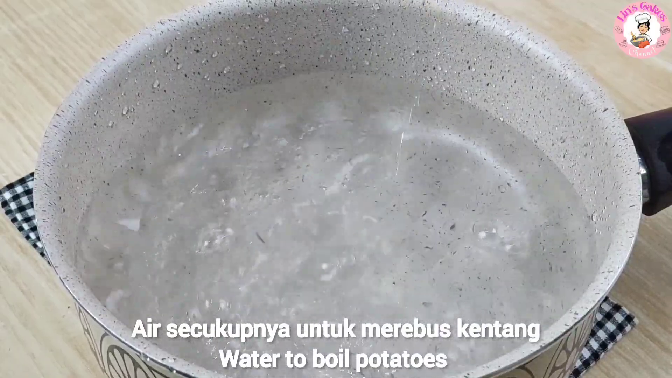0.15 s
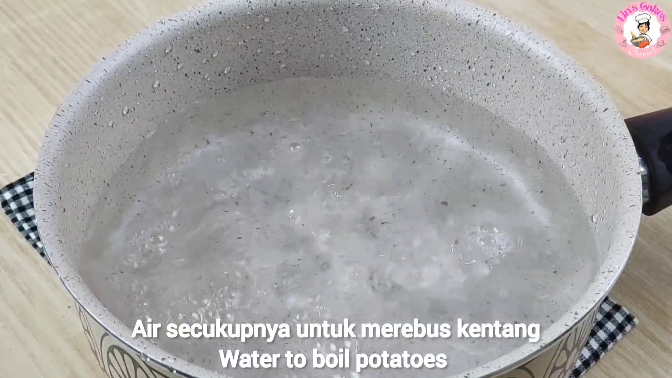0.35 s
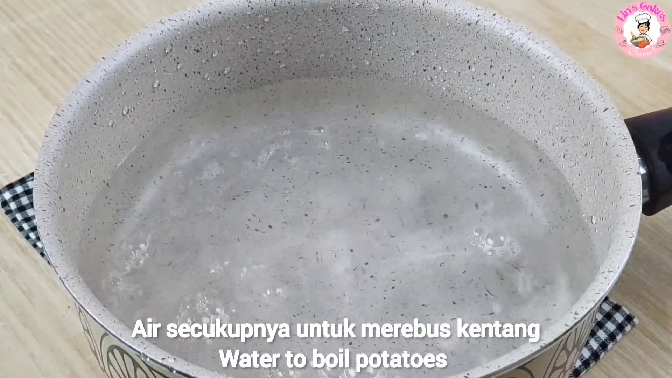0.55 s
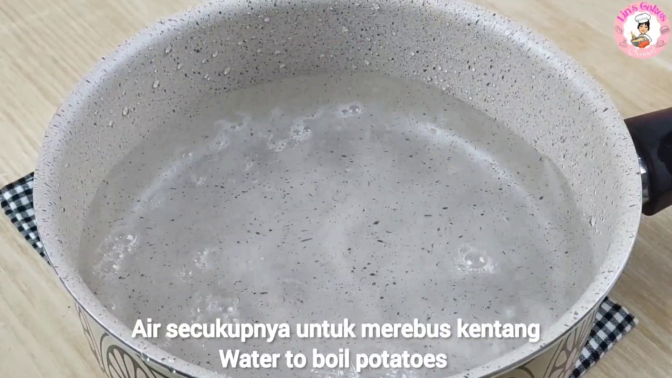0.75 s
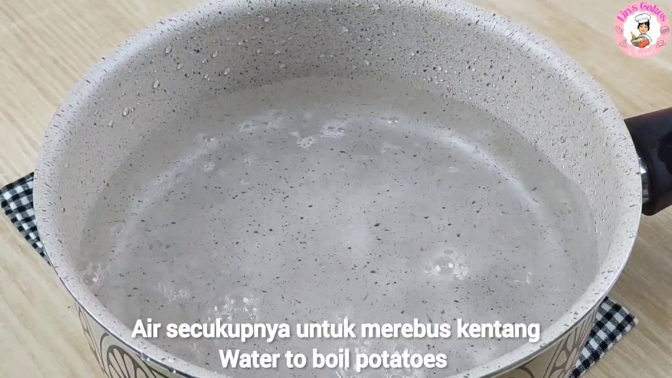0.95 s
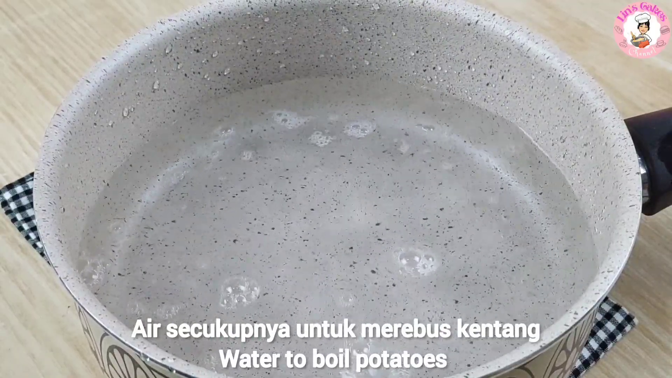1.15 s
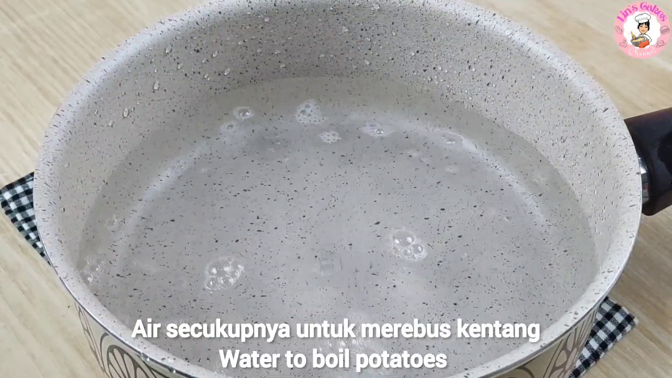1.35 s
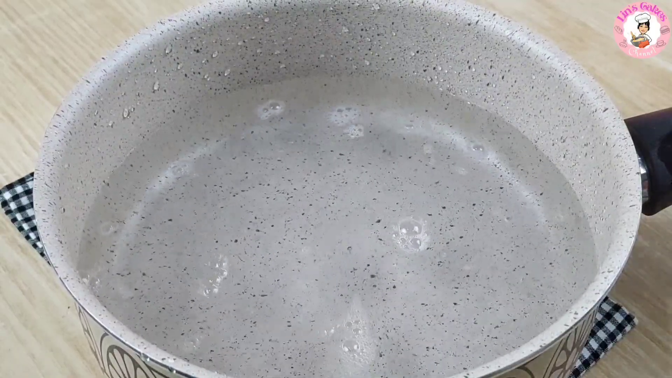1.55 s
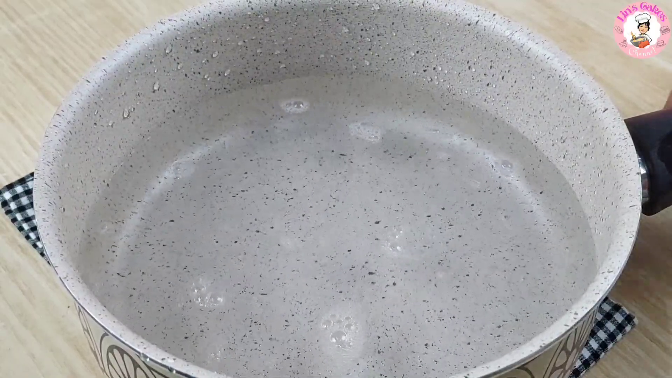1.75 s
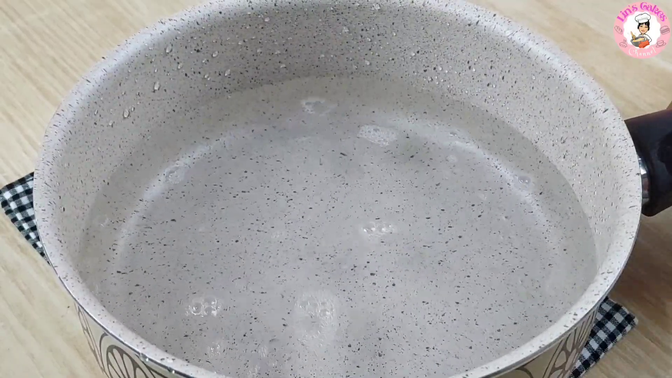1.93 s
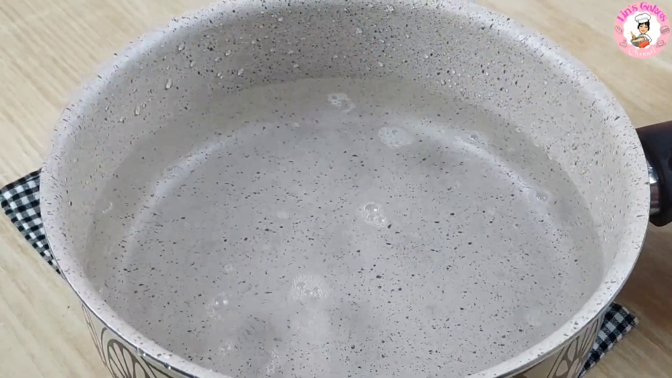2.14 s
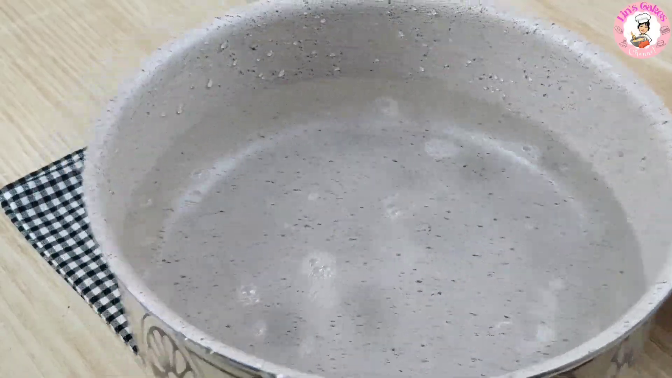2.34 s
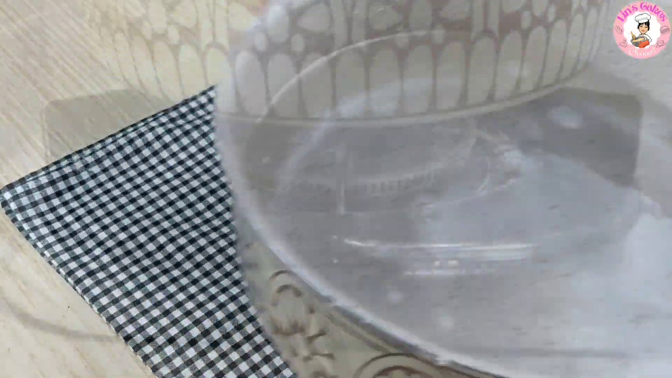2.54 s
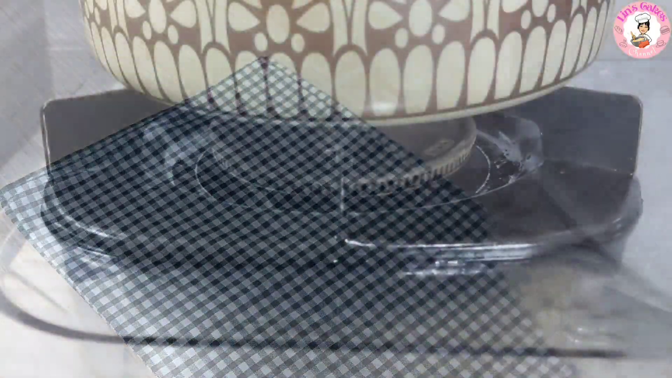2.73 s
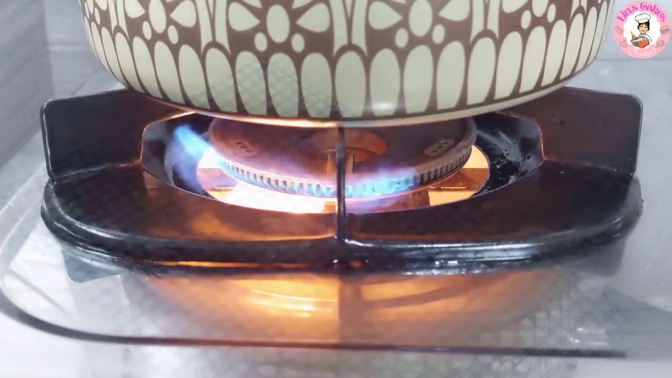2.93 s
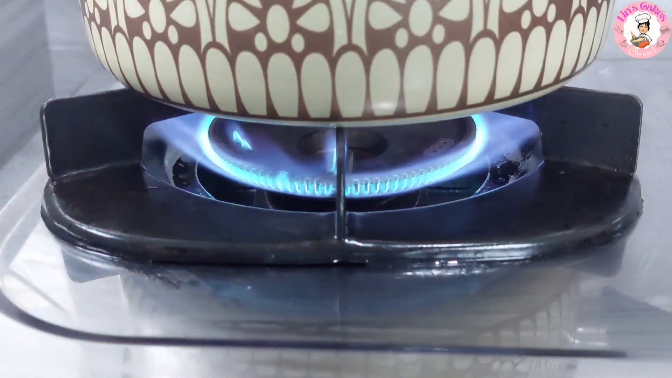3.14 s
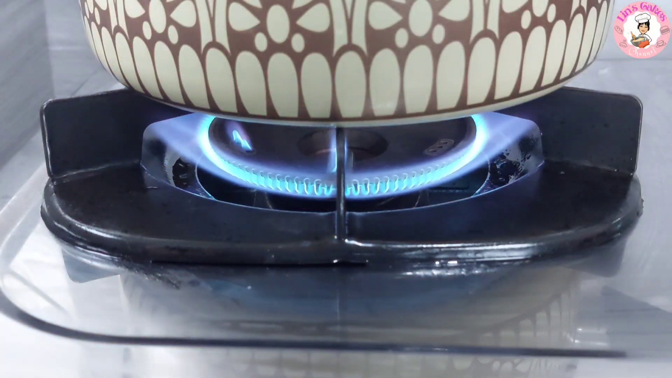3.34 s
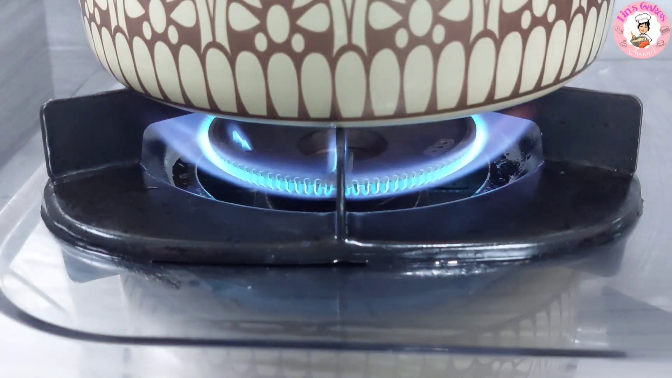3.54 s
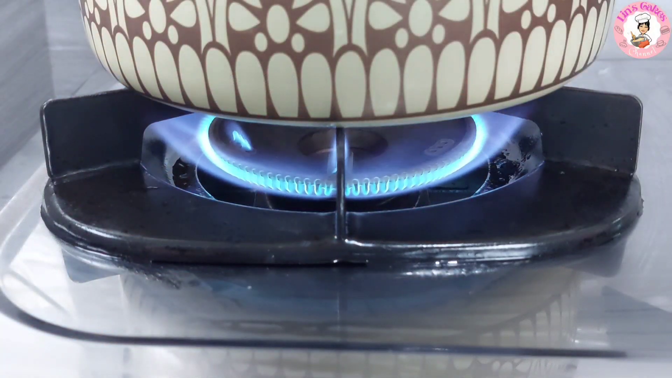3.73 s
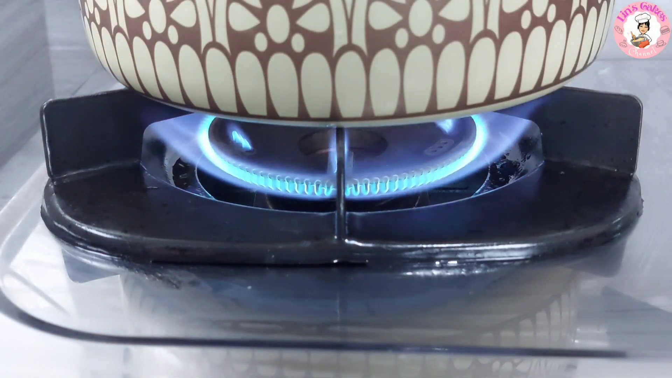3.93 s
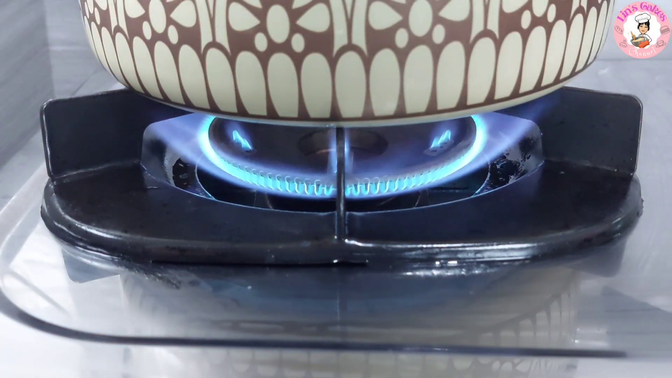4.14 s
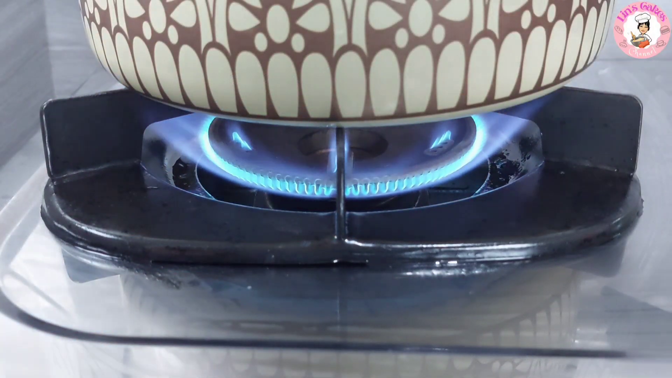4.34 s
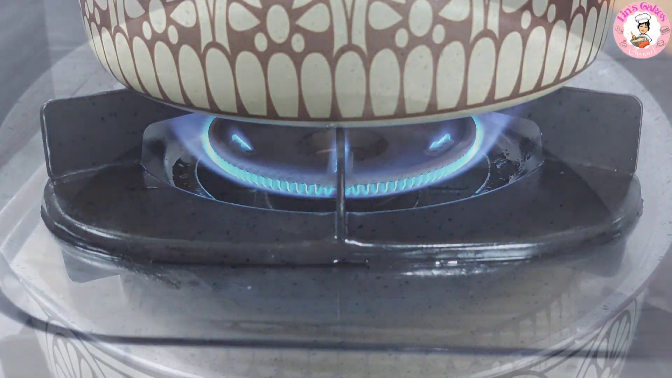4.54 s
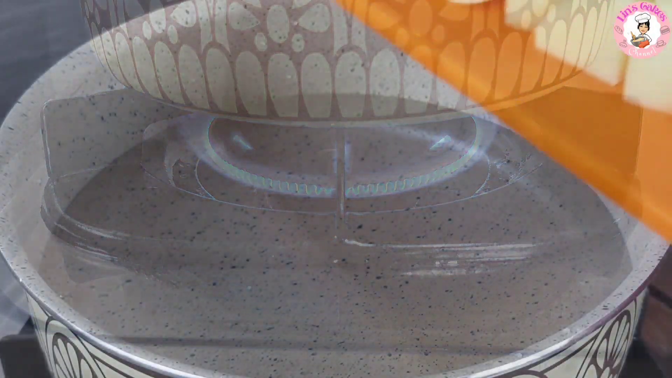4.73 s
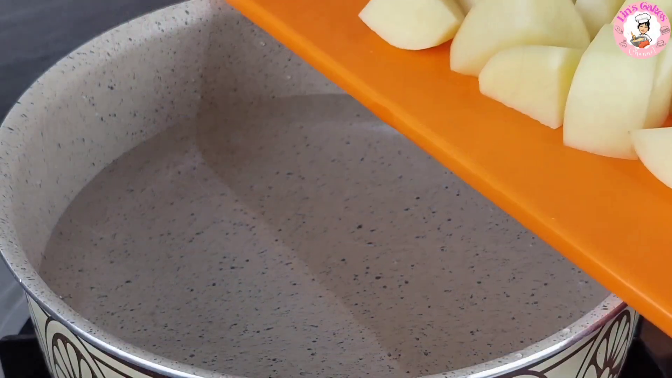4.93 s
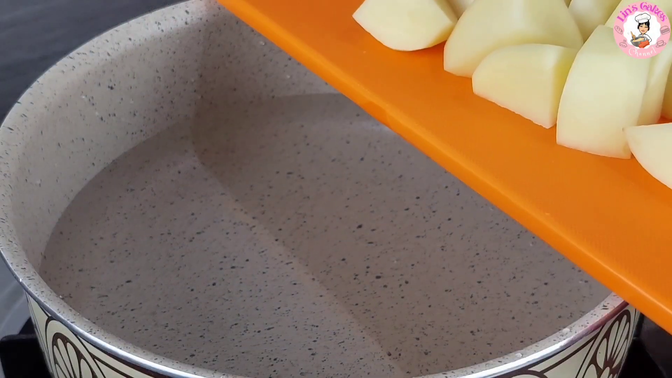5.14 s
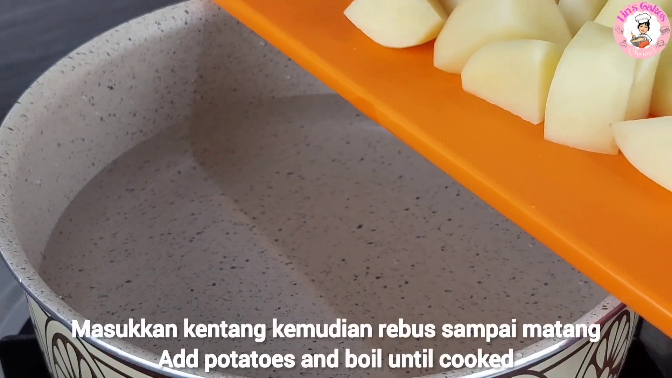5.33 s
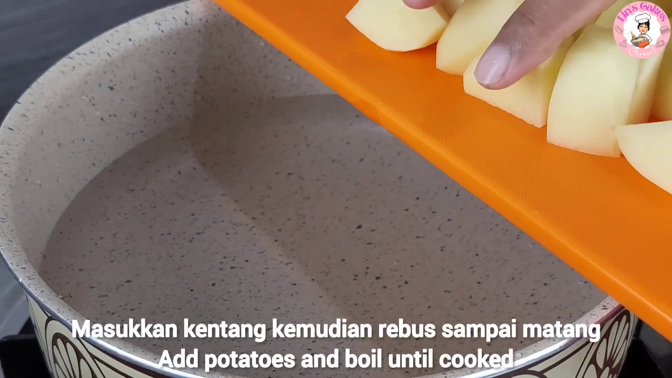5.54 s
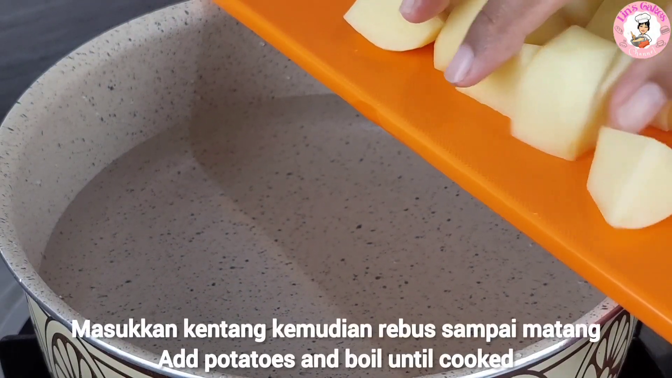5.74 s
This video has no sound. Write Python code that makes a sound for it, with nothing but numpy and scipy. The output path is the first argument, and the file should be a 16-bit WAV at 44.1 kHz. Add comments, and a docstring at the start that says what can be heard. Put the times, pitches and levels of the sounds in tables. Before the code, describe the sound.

In a quiet, hard-walled kitchen, the end of a poured stream splashes close by in a saucepan, with bubbles, drops, low gulps and soft swishes ending in a plop. A stove knob clicks, then one very loud metallic snap lights the gas with a low pop. The flame settles to a faint rush; dull board bumps follow. Close phone microphone, mono.

```python
"""A low hum and faint room noise run throughout a small kitchen, made from sines and coloured noise.
First the last of a stream splashes into a saucepan: tiny bubbles, spray, drops and low gulps.
Thin high tones sing, and soft swishes of grainy noise follow; the last one swoops down to a plop.
A gas stove's knob clicks round, its spring igniter snaps loudly and the burner catches with a pop.
At the end a plastic chopping board is rested on the pan's rim in a run of dull bumps."""
import sys
import numpy as np
from scipy import signal
from scipy.fft import rfft, irfft
from scipy.io import wavfile
from scipy.ndimage import uniform_filter1d

SR = 44100
rng = np.random.default_rng(int(sys.argv[2]) if len(sys.argv) > 2 else 0)


def dump(signal):
    """Clip the signal to [-1, 1] and save it as 16-bit WAV at the path in sys.argv[1]."""
    limited = np.clip(np.atleast_2d(signal).T, -1, 1)
    pcm = np.round(limited * 32767).astype(np.int16)
    wavfile.write(sys.argv[1], SR, pcm)


N = 254877  # length in samples
T = np.arange(N) / SR  # time in seconds


def undb(db):
    """Turn decibels into a gain."""
    return 10 ** (np.asarray(db) / 20)


def unit(x):
    """Scale to an average (rms) strength of 1."""
    return x / np.sqrt(np.mean(x ** 2) + 1e-20)


def noise(size=N):
    """White noise: all pitches equally strong."""
    return rng.standard_normal(size)


def gains(table):
    """Make one gain curve for each dB column of a table, silent outside its times."""
    s, *columns = np.transpose(table)
    inside = (T >= s[0]) * (T <= s[-1])
    return [undb(np.interp(T, s, column)) * inside for column in columns]


def colour(x, points):
    """Filter a sound through a curve of (pitch_hz, level_db) points, at rms 1."""
    hz, db = np.transpose(points)
    f = np.maximum(np.fft.rfftfreq(len(x), 1 / SR), 1)
    curve = undb(np.interp(np.log(f), np.log(hz), db))
    return unit(irfft(rfft(x) * curve, len(x)))


def resonate(x, peaks):
    """Pass a sound through (pitch_hz, width_hz, level_db) resonances side by side, at rms 1."""
    out = 0
    for hz, width, db in peaks:
        sharpness = max(hz / width, 1)
        out = out + undb(db) * signal.lfilter(*signal.iirpeak(hz, sharpness, SR), x)
    return unit(out)


def fade(t, t60):
    """Die away smoothly, dropping 60 dB in t60 seconds."""
    return np.exp(-np.log(1000) * t / t60)


def blow(t, t60, contact_s):
    """A contact builds over a moment, then dies away."""
    return fade(t, t60) * (1 - np.exp(-t / contact_s))


def swell(start, rise_s, end, sag_db_per_s, t60):
    """A loudness shape that rises, sags slowly while it holds and dies away after its end."""
    held = np.clip(T, start, end) - start
    rise = np.clip((T - start) / rise_s, 0, 1)
    return rise * undb(-sag_db_per_s * held) * fade(np.maximum(T - end, 0), t60)


def walk(rate):
    """Smooth random wander at rms 1, with `rate` new random points a second."""
    k = int(SR / rate)
    steps = np.interp(np.arange(N) / k, np.arange(4096), noise(size=4096))
    return unit(uniform_filter1d(steps, k))


def add(out, s, x):
    """Mix a sound in at time s."""
    i = max(int(s * SR), 0)
    out[i:i + len(x)] += x[:max(N - i, 0)]


def bubble(hz, cycles, glide=0.04):
    """A trapped bubble rings briefly and rises in pitch."""
    u = np.arange(int(SR * cycles / hz) + 2) * hz / SR / cycles  # runs from 0 to 1
    return np.sin(2 * np.pi * cycles * u * (1 + glide * u)) * fade(u, 1)


def thump(hz, t60, rise_s=0.0037):
    """A soft push that swings for a few cycles."""
    t = T[:SR // 2]
    return 2 * np.sin(2 * np.pi * hz * t) * blow(t, t60, rise_s)


# tone balance of the low room noise: pitch_hz, level_db
KITCHEN = [(15, -32.5), (25, -8), (55, 2), (116, -8), (152, 1), (173, -9.5), (246, -10.5), (523, -20),
           (567, -24.5), (1710, -24), (2300, -30.5), (5010, -34.5), (6050, -40), (6550, -37.5),
           (15500, -57)]
# the steady low hum: pitch_hz, level_db
HUM = [(48.5, -68.5), (73, -70.5), (148, -67)]
# how loud the faint airy hiss is over time: time_s, level_db
AIR = [(0, -66), (1.3, -72.5), (2.4, -74), (3.3, -90), (4.4, -84.5), (4.95, -74.5), (5.78, -73)]


def background(floor_db=-65, wander_db=1, hum_waver_db=2):
    """Low room noise, a hum whose sines waver in level and phase, and a little hiss."""
    floor = colour(noise(), KITCHEN) * undb(floor_db + wander_db * walk(2.5))
    hum = np.zeros(N)
    for hz, db in HUM:
        level = np.sqrt(2) * undb(db + hum_waver_db * walk(16))
        hum += level * np.sin(2 * np.pi * hz * T + .5 * walk(6))
    air = colour(noise(), [(200, -8.0), (600, 5.5), (2000, -2), (4500, -4.5), (7000, -10.5),
                           (10500, -12.5), (13000, -24.0)])
    return floor + hum + air * gains(AIR)[0]


# thin high tones: start_s, pitch_hz, level_db, length_s
TONES = [(-.1, 6970, -64, 0.59), (.15, 7250, -65.5, 1), (0.195, 3670, -73.5, 0.65),
         (0.585, 5389, -74.5, 0.54), (.77, 6466, -68, 0.31), (1.091, 8562, -65.5, 0.31),
         (1.29, 7030, -73.5, .14), (1.304, 2630, -75, .65), (1.499, 7150, -80, 0.24),
         (1.6, 8340, -78.5, 0.36), (1.696, 9417, -79, .45), (1.71, 4920, -76.5, 0.54),
         (2.053, 6468, -69.5, 0.53), (2.152, 7080, -72.5, 0.73), (2.2, 2560, -82, 0.28),
         (2.197, 8530, -81, .18), (4.042, 7050, -77, 0.77), (4.086, 2652, -82.5, 0.58)]
TONE_RISE_S, TONE_FADE_DB_PER_S, TONE_RELEASE_S = 0.055, 31, 0.027


def tones(waver_db=2.2, waver_hz=6):
    """Nearly pure whistles that swell, flutter as they sink and stop."""
    out = np.zeros(N)
    waver = undb(waver_db * walk(35))
    drift = np.cumsum(waver_hz * walk(40)) / SR  # pitch wander, summed into cycles
    for s, hz, db, length in TONES:
        on = (T > s) & (T < s + length)
        t = T[on] - s
        rise = np.minimum(t / TONE_RISE_S, 1)
        sink = undb(db - TONE_FADE_DB_PER_S * np.maximum(t - TONE_RISE_S, 0))
        release = np.minimum((length - t) / TONE_RELEASE_S, 1)
        whistle = np.sqrt(2) * np.sin(2 * np.pi * (hz * t + drift[on]))
        out[on] += rise * sink * release * whistle
    return out * waver


# tone balance of splashing water: pitch_hz, level_db
SPLASH_COLOUR = [(180, -25), (300, -3.5), (444, -25), (750, -11.5), (1080, -9.5), (1440, -1), (1790, -9),
                 (3610, -3), (6000, -11), (8050, -8.5), (8880, -19.5), (15000, -40)]
# single drops slapping the surface: time_s, level_db, bubble_start_pitch_hz
DROPS = [(.046, -49.5, 2200), (0.069, -54, 1390), (.122, -38.5, 3470), (0.126, -42, 2330),
         (.132, -51, 1410), (.137, -37, 3980), (.144, -40.5, 3500), (.146, -44.5, 760),
         (0.1777, -43.5, 4640), (.179, -44, 10200), (.182, -45, 1430), (.190, -42, 3460),
         (0.269, -54.5, 5600), (0.6673, -58, 4100), (0.7122, -53, 3680), (1.061, -46.5, 2980),
         (1.079, -50.5, 1670), (1.152, -46, 5030), (1.255, -56.5, 1063), (1.406, -56, 3280)]
# tone balance of the heaving water: pitch_hz, level_db
HEAVE_COLOUR = [(24, -36), (40, -3), (65, -3.5), (97, 1), (172, -5.5), (226, -9), (434, -20.5),
                (900, -26.5), (1170, -49), (1980, -120)]
# the stream gathers a little, then breaks off
STREAM_DB, STREAM_RISE_S, STREAM_GROWTH_DB_PER_S, STREAM_STOP_S, STREAM_T60_S = -55.5, 0.023, 36, .155, .24
# the water heaves in the pan, then settles
HEAVE_DB, HEAVE_RISE_S, HEAVE_SAG_DB_PER_S, HEAVE_STOP_S, HEAVE_T60_S = -55, 0.071, 6, 1.19, 0.45


def pour(slap_t60=0.035, contact_s=0.00049, bubble_cycles=48, bubble_db=4, grain_cycles=22,
         spread_db=5, spray_db=-8):
    """The stream beats in tiny bubbles and spray, single drops slap and ring; the water heaves below."""
    fizz, drops = np.zeros(N), np.zeros(N)
    span = STREAM_STOP_S + STREAM_T60_S
    for when, pitch, chance in rng.random((520, 3)):
        level = undb(spread_db * min(-np.log(chance), 2))  # a few bubbles are much louder
        add(fizz, when * span, level * bubble(700 * 14 ** pitch, grain_cycles))
    # the bubbles fill only this span, so scale for its share of the whole
    fizz = colour(fizz, SPLASH_COLOUR) * np.sqrt(span / T[-1])
    spray = colour(noise(), SPLASH_COLOUR)
    t = T[:4096]
    for s, db, hz in DROPS:
        slap = colour(noise(len(t)), SPLASH_COLOUR) * blow(t, slap_t60, contact_s)
        add(drops, s, undb(db) * slap)
        add(drops, s, undb(db + bubble_db) * bubble(hz, bubble_cycles))
    flow = undb(STREAM_DB) * swell(0, STREAM_RISE_S, STREAM_STOP_S, -STREAM_GROWTH_DB_PER_S, STREAM_T60_S)
    heave = colour(noise(), HEAVE_COLOUR) * undb(HEAVE_DB)
    heave *= swell(0, HEAVE_RISE_S, HEAVE_STOP_S, HEAVE_SAG_DB_PER_S, HEAVE_T60_S)
    return (fizz + undb(spray_db) * spray) * flow + drops + heave


# low gulps of the water: time_s, level_db, pitch_hz
GULPS = [(0.197, -41.5, 105), (0.298, -38, 85), (.3, -37.5, 222), (.781, -47, 64.5), (.927, -37, 111),
         (0.969, -40, 57), (1.194, -42.5, 58.3), (1.518, -39.5, 60.4), (1.611, -49, 64.4)]
GULP_CYCLES = 5.6  # swings until a gulp has died away by 60 dB


def gulps():
    """Low gulps swing for the same number of cycles, so the deeper ones last longer."""
    out = np.zeros(N)
    for s, db, hz in GULPS:
        add(out, s, undb(db) * thump(hz, GULP_CYCLES / hz))
    return out


# hollow resonances of the swishes: pitch_hz, width_hz, level_db
SWISH_BODY = [(515, 41, 10.5), (750, 62, 8.5), (1220, 40, 7), (1380, 23, -10)]
# tone balance of their hiss: pitch_hz, level_db
SWISH_HISS = [(880, -10.5), (1500, -3.5), (2830, -3), (3210, -1), (3540, -6), (5150, -1), (8830, -9),
              (15000, -32)]
# soft swishes: start_s, rise_s, end_s, hollow_body_db, hiss_db, t60_s
SWISHES = [(.924, 0.024, .968, -44.5, -58, 0.043), (1.068, 0.011, 1.194, -51.5, -57.5, 0.35),
           (1.395, 0.036, 1.486, -67.5, -56, 0.32)]
SWISH_SAG_DB_PER_S = 29.5
# the last swish carries a resonance that falls, and a plop
SWOOP_START_S, SWOOP_END_S, SWOOP_FROM_HZ, SWOOP_OCTAVES_PER_S, SWOOP_DB = 1.415, 1.498, 5200, 18, -59.5
PLOP_HZ, PLOP_DB, PLOP_CYCLES = 728, -48, 78


def swishes(grain_db=4, flutter_db=-1.8, wash_db=2, bubbles_db=-2, bubble_cycles=20):
    """Uneven grains and small bubbles through hollow resonances, with hiss on top."""
    grain_levels = np.repeat(noise(N // 16 + 1), 16)[:N]  # a new level every 16 samples
    grains = noise() * undb(grain_db * grain_levels + flutter_db * walk(180))
    bubbles = np.zeros(N)
    first_s = SWISHES[0][0]
    span = SWOOP_END_S - first_s
    for when, pitch, size in rng.random((500, 3)):
        hz = 400 * 22 ** pitch
        add(bubbles, first_s + when * span, size * hz * bubble(hz, bubble_cycles))
    grains = unit(grains) + undb(bubbles_db) * unit(bubbles) * np.sqrt(span / T[-1])
    wash = colour(grains, [(150, 14.5), (450, -1.5), (900, -0.5), (1600, 2.0), (2000, -35), (5000, -56)])
    hollow = resonate(grains, SWISH_BODY)
    hollow = colour(hollow, [(150, 18.5), (450, 0), (1600, -9), (2300, -25), (6000, -22)])
    body = unit(hollow + undb(wash_db) * wash)
    hiss = colour(grains, SWISH_HISS)
    out = np.zeros(N)
    for start, rise, end, body_db, hiss_db, t60 in SWISHES:
        swish = undb(body_db) * body + undb(hiss_db) * hiss
        out += swish * swell(start, rise, end, SWISH_SAG_DB_PER_S, t60)
    return out


def swoop(width=.26, rise_s=0.017, t60=.35):
    """A narrow, noisy resonance glides down; one large bubble plops as it begins to die away."""
    octaves = SWOOP_OCTAVES_PER_S * np.maximum(T - SWOOP_START_S, 0)
    hz = np.maximum(SWOOP_FROM_HZ * 2 ** -octaves, PLOP_HZ)
    cycles = np.cumsum(hz) / SR
    # random strength that changes in step with the cycles, so the band narrows as the pitch falls
    wander = np.interp(cycles * 2 * width, np.arange(N), noise())
    out = undb(SWOOP_DB) * unit(wander * np.sin(2 * np.pi * cycles))
    out *= swell(SWOOP_START_S, rise_s, SWOOP_END_S, 0, t60)
    add(out, SWOOP_END_S, undb(PLOP_DB) * bubble(PLOP_HZ, PLOP_CYCLES))
    return out


# sheet metal of the stove and the pan on it: pitch_hz, level_db, t60_s
STOVE_MODES = [(250.5, -18, 0.67), (1004, -15, 0.35), (1240, -8.5, 0.1), (1452, -13.5, 0.25),
               (1550, -10.5, 0.37), (1826, -9, .34), (2023, -10.5, 0.32), (2247, -13.5, 0.14),
               (2430, -21.5, 0.68), (2870, -11.5, 0.2), (3240, -14, 0.17), (3223, -12.5, .28),
               (3726, -14, 0.17), (4020, -16, 0.14), (4080, -11.5, .36), (4290, -9.5, 0.34),
               (4300, -15.5, .5), (4947, -12, .32), (5170, -20.5, .26), (5350, -19, .28), (5650, -18.5, .2),
               (7106, -26.5, .48), (7892, -28, .37), (9287, -31, 0.53)]


def metal_ring():
    """The metal's modes, each in a chance phase; loose sheet metal makes every ring waver."""
    t, out = T[:SR], 0
    for hz, db, t60 in STOVE_MODES:
        wobble = .2 * np.interp(40 * t, np.arange(41), noise(41))  # in cycles
        ring = np.sin(2 * np.pi * (hz * t + rng.random() + wobble))
        out = out + undb(db) * ring * fade(t, t60)
    return out


# tone balance of the clicks: pitch_hz, level_db
CLICK_COLOUR = [(88, -37), (150, -5), (352, -13), (618, 0.5), (860, -9), (1000, -3), (1450, -6), (1910, -3),
                (2060, -5.5), (2230, -5.5), (3100, -11.5), (4930, -8), (6230, -16.5), (7560, -12),
                (15500, -34)]
# the knob's pawl (a small catch) slips with a ping: time_s, level_db, rattle_compared_to_ping_db
PAWL_TICKS = [(2.3916, -60, -10), (2.4923, -48, 3), (2.6694, -66, 1.5), (2.692, -58.5, -0.5),
              (2.7087, -35.5, -15), (2.9485, -41, -1.5), (4.55, -70.5, 7)]
# the knob's catches drop in and rattle the casing: time_s, level_db, treble_db
CATCHES = [(2.3911, -57, 0), (2.510, -42, 7.5), (2.7226, -40, 4), (2.7812, -47.5, 2), (2.858, -29.5, 0.5),
           (4.365, -63, 9)]
PAWL_HZ, PAWL_T60_S, CATCH_T60_S = 3300, .035, .1


def knob(ring_db=-29, bass_db=-1, catch_ping_db=-5, tick_treble_db=-12, ping_width_hz=700, contact_s=0.00026):
    """The pawl pings as it slips; each catch rattles the stove's casing and rings its metal."""
    out, t = np.zeros(N), T[:16384]
    pawl = [(PAWL_HZ, ping_width_hz, 0)]

    def ping():
        """Noise through the pawl's resonance twice, which narrows it."""
        return resonate(resonate(noise(len(t)), pawl), pawl)

    def rattle(treble_db):
        """Click-coloured noise with its treble raised or lowered."""
        click = colour(noise(len(t)), CLICK_COLOUR)
        return colour(click, [(900, bass_db), (2800, 0.00087), (5000, 0), (11000, treble_db)])

    for s, db, rattle_db in PAWL_TICKS:
        tick = ping() + undb(rattle_db) * rattle(tick_treble_db)
        add(out, s, undb(db) * tick * blow(t, PAWL_T60_S, contact_s))
    for s, db, treble_db in CATCHES:
        clack = rattle(treble_db) + undb(catch_ping_db) * ping()
        add(out, s, undb(db) * clack * blow(t, CATCH_T60_S, contact_s))
        add(out, s, undb(db + ring_db) * metal_ring())
    return out


# the gas valve rubs as it turns: pitch_hz, width_hz, level_db (passed through twice)
VALVE_BODY = [(305, 90, 0), (464, 140, -4)]
VALVE_START_S, VALVE_RISE_S, VALVE_END_S, VALVE_T60_S, VALVE_DB = 2.665, .07, 2.81, .1, -56


def valve():
    """The turning valve rubs and the stove's body groans softly: noise through its resonances."""
    groan = resonate(resonate(noise(), VALVE_BODY), VALVE_BODY)
    return undb(VALVE_DB) * groan * swell(VALVE_START_S, VALVE_RISE_S, VALVE_END_S, 0, VALVE_T60_S)


# the igniter hammer and its rebounds: time_s, level_db, t60_s
SNAPS = [(2.9506, -10, 0.06), (2.9534, -13.5, 0.14), (2.9632, -25, 0.33)]
# tone balance of the crack: pitch_hz, level_db
SNAP_COLOUR = [(60, -18), (120, -13.5), (260, -8), (400, -14), (800, -12), (1250, -6.5), (2200, -3.5),
               (3200, -4), (4900, -3), (5800, -10), (7500, -9), (9000, -21.5), (11000, -17.5), (13500, -13),
               (15500, -32)]
# broad resonances of the stove's casing: pitch_hz, width_hz, level_db
SNAP_PEAKS = [(520, 40, -15.5), (690, 140, -8.5), (971, 40, -4.5), (1237, 65, -3), (1570, 90, -0.5),
              (1840, 60, -1), (1920, 178.1, -1), (2624, 350, -5.5), (3140, 220, 5), (3800, 360, -1.5),
              (4260, 170, -3.5), (4540, 160, 1.5), (6350, 210, -8.5), (7250, 300, -10.5)]


def igniter(ring_db=-22.5, peaks_db=-3, crack_db=-4.0, split_hz=7500, treble_life=0.63):
    """A sprung hammer strikes and rebounds; the casing cracks, its treble dies first and the metal rings."""
    out, t = np.zeros(N), T[:16384]
    lowpass = signal.butter(2, split_hz, fs=SR, output="sos")
    for s, db, t60 in SNAPS:
        crack = undb(crack_db) * colour(noise(len(t)), SNAP_COLOUR)
        crack += undb(peaks_db) * resonate(noise(len(t)), SNAP_PEAKS)
        low = signal.sosfiltfilt(lowpass, crack)
        treble = crack - low
        add(out, s, undb(db) * (low * fade(t, t60) + treble * fade(t, t60 * treble_life)))
    add(out, SNAPS[0][0], undb(ring_db) * metal_ring())
    return out


# tone balance of the low rumble: pitch_hz, level_db
FLARE_COLOUR = [(30, -10.5), (60, 3), (150, 2.5), (260, -5.5), (400, -9.5), (700, -11.5), (1500, -39),
                (5000, -80)]
# tone balance of the soft rush: pitch_hz, level_db
BURN_COLOUR = [(300, -9), (800, -7.5), (1150, -1), (1700, -4.5), (2300, -17), (5500, -27.5), (7800, -13.5),
               (9500, -26.5), (12000, -24), (15000, -41)]
# the gas catches with a pop, flares up and settles to a flame
LIGHT_S, POP_HZ, POP_DB, POP_T60_S, POP_RISE_S = 2.97, 122, -24, 0.078, .008
FLARE_DB, FLARE_RUSH_DB, FLARE_SAG_DB_PER_S = -43.5, -51, 8
FLARE_RISE_S, FLARE_END_S, FLARE_T60_S = 0.024, 3.162, 0.23
BURN_DB, BURN_RUMBLE_DB, BURN_END_S, BURN_T60_S = -73.5, -65.5, 4.3, 3.3


def burner(flutter_db=2, flicker_db=1, pop_sub_db=-4, rumble_sag_db_per_s=7):
    """The gas catches with a pop and a low flare, then burns with a soft rush as its rumble sinks."""
    flare = swell(LIGHT_S, FLARE_RISE_S, FLARE_END_S, FLARE_SAG_DB_PER_S, FLARE_T60_S)
    sinking = swell(LIGHT_S, FLARE_RISE_S, BURN_END_S, rumble_sag_db_per_s, BURN_T60_S)
    steady = swell(LIGHT_S, FLARE_RISE_S, BURN_END_S, 0, BURN_T60_S)
    rumble_level = undb(FLARE_DB) * flare + undb(BURN_RUMBLE_DB) * sinking
    rush_level = undb(FLARE_RUSH_DB) * flare + undb(BURN_DB) * steady
    rumble = colour(noise(), FLARE_COLOUR) * rumble_level * undb(flutter_db * walk(35))
    rush = colour(noise(), BURN_COLOUR) * rush_level * undb(flicker_db * walk(7.9))
    out = rumble + rush
    pop = thump(POP_HZ, POP_T60_S, POP_RISE_S)
    octave_below = thump(POP_HZ / 2, 2 * POP_T60_S, 2 * POP_RISE_S)
    add(out, LIGHT_S, undb(POP_DB) * (pop + undb(pop_sub_db) * octave_below))
    return out


# the chopping board settling on the rim: time_s, level_db, treble_db
BUMPS = [(4.967, -48.5, 11), (4.985, -44, -5), (5.009, -47, -3), (5.04, -49.5, 3), (5.066, -53, 14)]
# tone balance of a bump: pitch_hz, level_db
BUMP_COLOUR = [(24, -36.5), (40, 1), (65, 2.5), (112, -21), (146, -7.5), (284, -6.5), (347, -14),
               (576, -7.5), (690, -19.5), (1340, -24.5), (2060, -29), (2620, -30.5), (5000, -30),
               (6500, -72), (11000, -120)]
BUMP_T60_S = 0.22


def board(contact_s=0.0013):
    """The loaded board meets the rim and settles in a run of dull bumps of coloured noise."""
    out, t = np.zeros(N), T[:16384]
    for s, db, treble_db in BUMPS:
        thud = colour(noise(len(t)), BUMP_COLOUR)
        thud = colour(thud, [(400, 0.5), (1100, treble_db), (3000, treble_db - 10.5), (7000, -24)])
        add(out, s, undb(db) * thud * blow(t, BUMP_T60_S, contact_s))
    return out


# echo of the kitchen: pitch_hz, t60_s, level_db
ROOM = [(100, .65, 2), (246, .7, 3), (500, 0.56, 4), (1800, 0.52, 0), (4440, 0.6, -4), (7500, 0.56, -1),
        (9500, 0.71, -8.5), (13490, 0.28, -10)]


def reverb(x, build_s=0.0064):
    """Hard kitchen walls: a diffuse noise tail in half-octave bands whose top treble dies first."""
    t, (hz, t60, db) = T[:SR], np.transpose(ROOM)
    tail = 0
    for centre in 60 * 2 ** (np.arange(17) / 2):
        edges = [centre / 2 ** .25, centre * 2 ** .25]
        sos = signal.butter(3, edges, "band", fs=SR, output="sos")
        band = signal.sosfilt(sos, noise(SR)) * fade(t, np.interp(centre, hz, t60))
        tail = tail + band * undb(np.interp(centre, hz, db))
    tail = tail * (1 - np.exp(-t / build_s))
    return signal.fftconvolve(x, tail / np.sqrt(np.sum(tail ** 2)))[:N]


def scene(water_room_db=-19, stove_room_db=-10, board_room_db=-12):
    """The pan is close by; the stove is loud enough to wake the room."""
    water = pour() + swishes() + swoop()
    stove = knob() + valve() + igniter()
    bumps = board()
    room = reverb(undb(water_room_db) * water + undb(stove_room_db) * stove + undb(board_room_db) * bumps)
    return (water + stove + bumps + room + gulps() + tones() + burner() + background())[None]


TOP_HZ = 15750


def record(dry):
    """The phone drops the deepest bass, below 35 Hz, and cuts the top."""
    dry = signal.sosfilt(signal.butter(4, 35, "high", fs=SR, output="sos"), dry)
    return signal.sosfilt(signal.ellip(10, .2, 80, TOP_HZ, fs=SR, output="sos"), dry)


dry = scene()
out = record(dry)
dump(out)
```